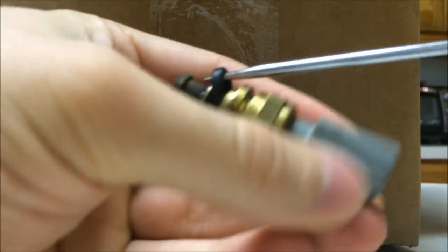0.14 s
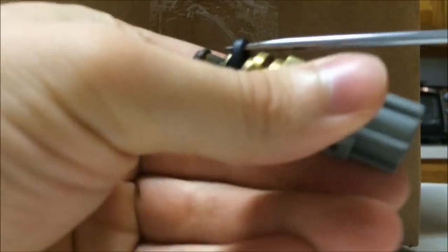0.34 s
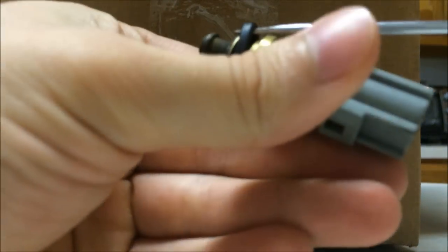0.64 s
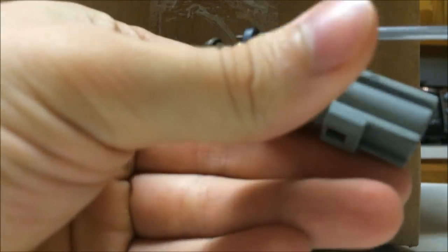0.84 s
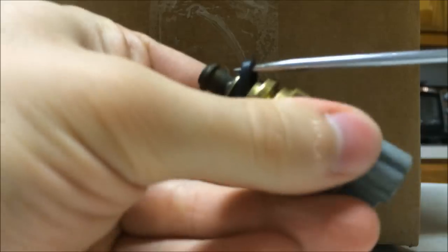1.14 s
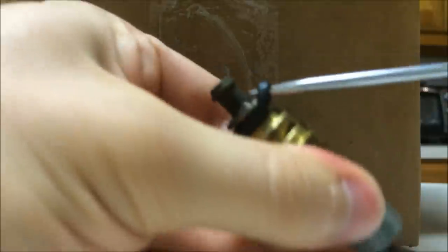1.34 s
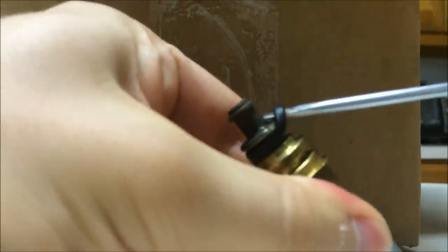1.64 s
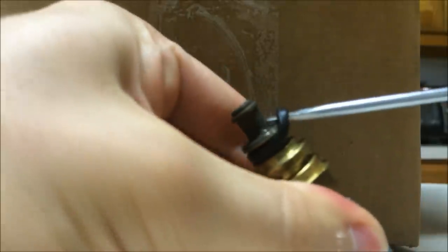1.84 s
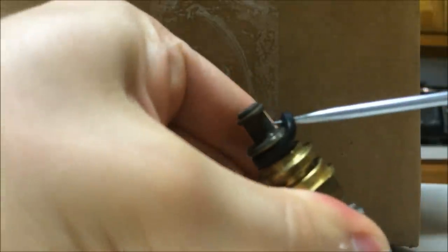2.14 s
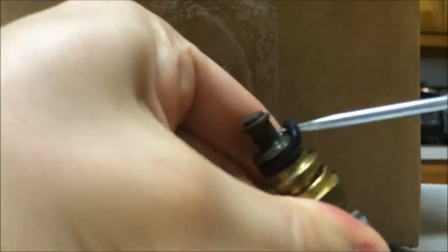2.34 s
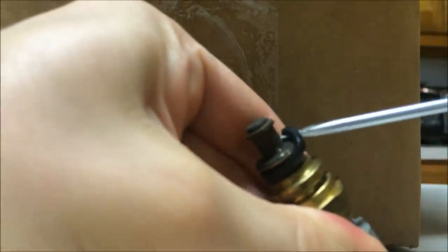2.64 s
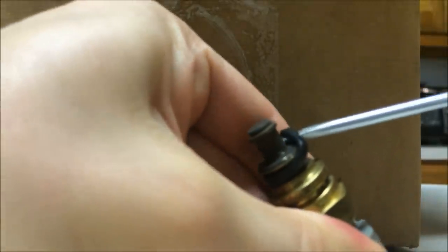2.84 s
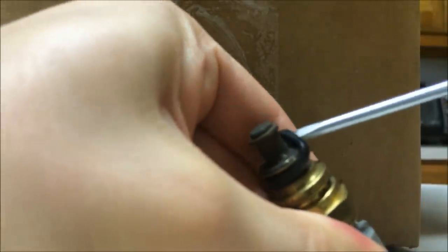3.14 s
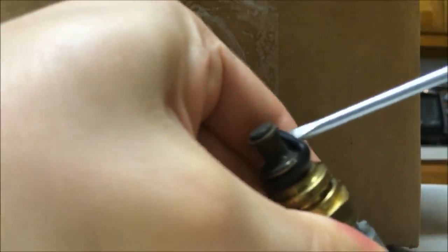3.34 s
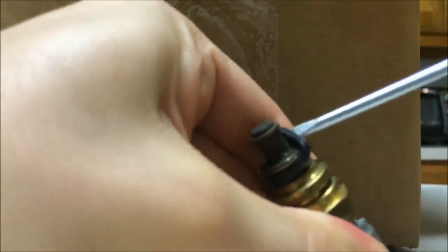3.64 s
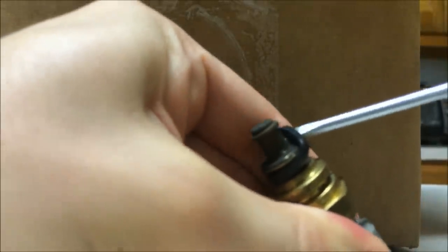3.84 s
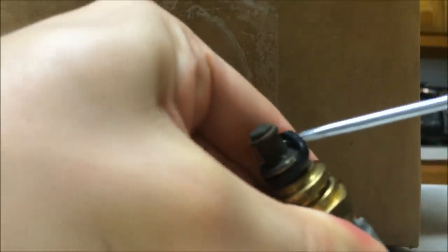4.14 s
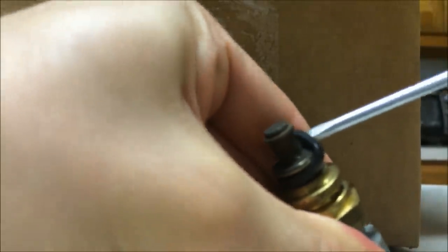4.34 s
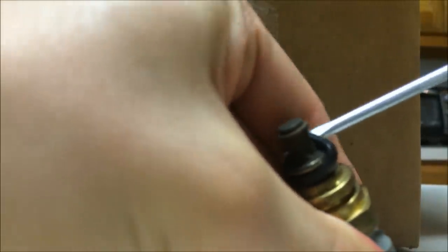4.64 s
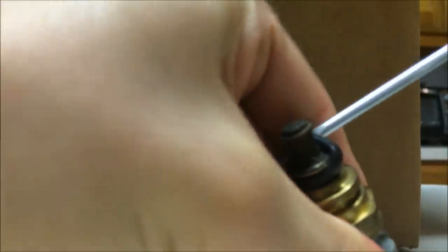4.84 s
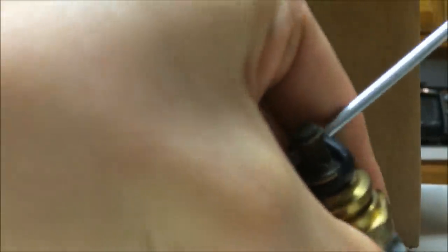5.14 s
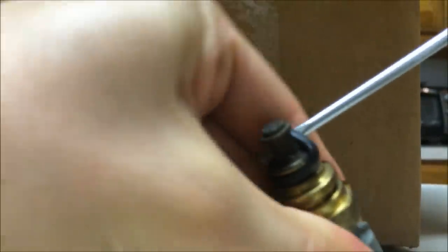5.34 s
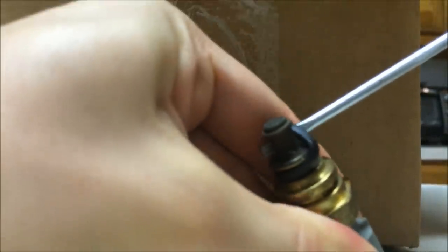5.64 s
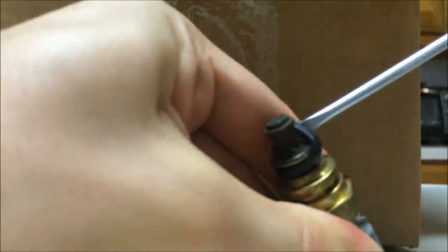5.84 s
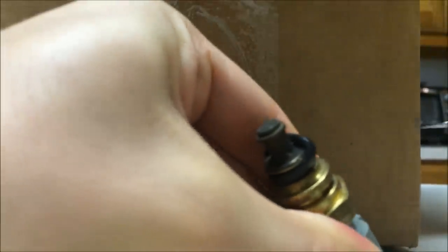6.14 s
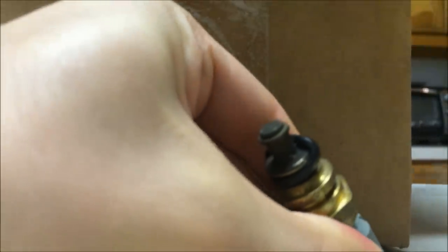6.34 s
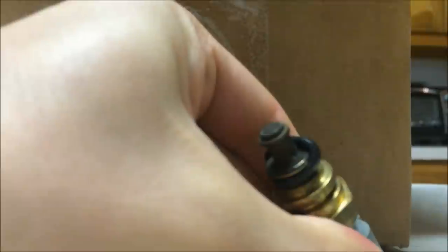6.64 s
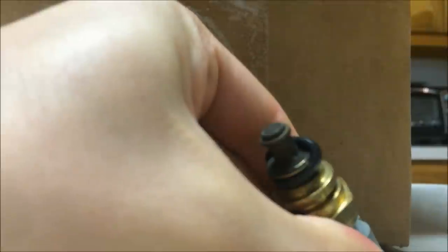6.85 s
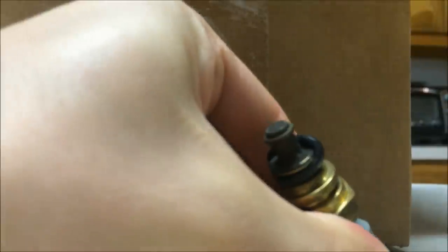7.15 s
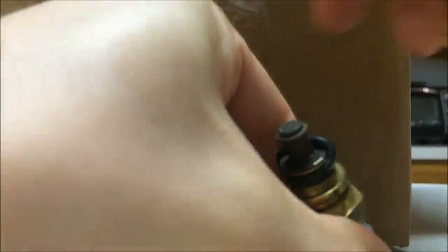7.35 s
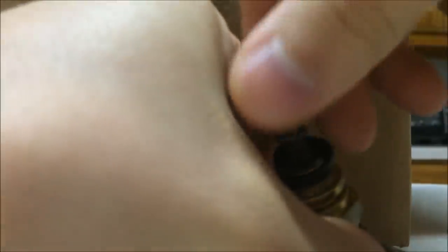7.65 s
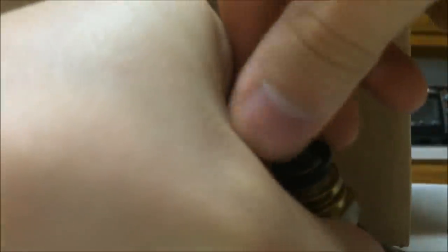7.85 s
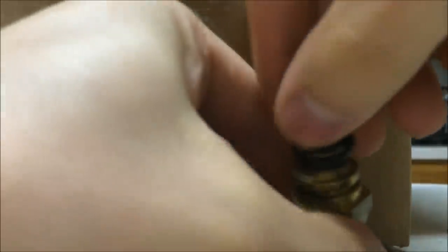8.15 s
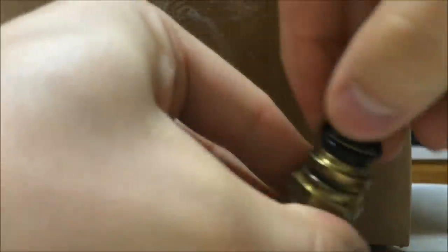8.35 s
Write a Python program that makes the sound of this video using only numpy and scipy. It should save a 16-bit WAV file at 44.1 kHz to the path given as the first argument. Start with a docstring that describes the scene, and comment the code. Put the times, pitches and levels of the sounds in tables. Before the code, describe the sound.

A screwdriver tip catches, scrapes and skids off a hand-held metal sensor; a thud, a rattling tool drop, then soft finger rubbing in a quiet room.

```python
"""Prying a rubber ring off a brass sensor

A screwdriver tip works on a hand-held sensor, close by, over a workbench in a small humming room.
It ticks, rubs and finally skids off; fingers brush and bump the part, and the bench is knocked.
Then the screwdriver drops and clatters on the bench, and bare fingers take over.
Blows are short dying tones plus noisy cracks; rubbing and the fan's rush are shaped noise; the hum is sines."""
import sys
import numpy as np
from scipy import signal
from scipy.fft import rfft, irfft, next_fast_len
from scipy.io import wavfile

SR = 44100
rng = np.random.default_rng(int(sys.argv[2]) if len(sys.argv) > 2 else 0)


def unload_audio(sound):
    """Save the sound as a 16-bit wav file, at the path given as the first command line argument."""
    columns = np.transpose(np.atleast_2d(sound))
    # keep every value between -1 and 1, then stretch to whole-number steps
    steps = np.round(np.clip(columns, -1, 1) * 32767)
    wavfile.write(sys.argv[1], SR, steps.astype(np.int16))


N = 373968
TIME = np.arange(N) / SR  # seconds

# tone colour of a hard contact of the tip: (frequency [Hz], relative level [dB])
TIP_CRACK = [(300, -15), (1500, -3), (3500, -3.5), (5500, 6), (7500, -1), (10000, -5), (13000, -1.5),
             (16000, -14)]
# pulls that drag the ring over its seat: (middle [s], length [s], level [dB])
DRAGS = [(1.71, 0.11, -71), (2.08, 0.13, -67), (2.21, 0.13, -65), (2.39, 0.38, -69), (2.8, 0.27, -66),
         (3.08, .3, -71), (3.6, 1.1, -73.5), (4.09, .18, -72), (4.78, .6, -73.5), (5.413, .04, -56.5),
         (5.58, .3, -72), (8.07, .16, -73), (8.33, 0.32, -69)]


def from_db(db):
    """Turn decibels into a gain."""
    return 10 ** (np.asarray(db) / 20)


def rms_one(x):
    """Scale to an rms (average strength) of 1."""
    return x / np.sqrt(np.mean(x ** 2) + 1e-20)


def at_hz(points, hz):
    """Read a table between its points, on a logarithmic frequency axis."""
    table = np.array(points)
    return np.interp(np.log(np.maximum(hz, 1)), np.log(table[:, 0]), table[:, 1])


def level(strokes):
    """Gain over time: every stroke swells and fades in one smooth arch."""
    gain = np.zeros(N)
    for middle, length, db in strokes:
        arch = np.cos(np.pi * np.clip((TIME - middle) / length, -.5, .5)) ** 1.4
        gain += from_db(db) * arch
    return gain


def drift(rate):
    """Random wander: straight lines between random values, `rate` values a second."""
    knots = rng.standard_normal(N // 50)
    return np.interp(TIME * rate, np.arange(len(knots)), knots)


def coloured(x, spectrum):
    """Filter to the given spectrum with no sound ahead of its cause (minimum phase); mean power gain 1."""
    size = 2 * next_fast_len(len(x) // 2 + 2048)
    hz = np.arange(size // 2 + 1) * SR / size
    gain = rms_one(from_db(at_hz(spectrum, hz)))
    # folding the cepstrum turns the gain into a minimum-phase filter
    cepstrum = irfft(np.log(gain))
    cepstrum[1:size // 2] *= 2
    cepstrum[size // 2 + 1:] = 0
    response = np.exp(rfft(cepstrum))
    return irfft(rfft(x, size) * response)[:len(x)]


def add(track, s, sound):
    """Mix a sound into the track at time s."""
    start = int(s * SR)
    track[start:start + len(sound)] += sound[:N - start]


def ring(modes, scatter_db, detune):
    """One blow on a body: damped sines whose strength and pitch vary at random from blow to blow."""
    hz, db, t60 = np.transpose(modes)[:, :, None]
    t = TIME[:int(np.max(t60) * SR * 2)]
    strength, shift = rng.standard_normal((2, len(hz), 1))
    signs = (-1) ** np.arange(len(hz))[:, None]
    gain = signs * from_db(db + scatter_db * strength)
    decay = np.exp(-np.log(1000) * t / t60)  # down 60 dB after t60
    tones = np.sin(2 * np.pi * hz * (1 + detune * shift) * t)
    return np.sum(gain * decay * tones, axis=0)


def crack(spectrum, t60, spike=1.7):
    """A hard contact: a spike, then a short burst of dense, fast-dying modes of fairly even strength."""
    evenness = .6  # 0: the modes have random strengths, 1: all alike
    t = TIME[:2048]
    decay = np.exp(-np.log(1000) * t / t60)
    force = rng.standard_normal(len(t)) * decay
    force[0] = spike
    modes = rfft(force)
    even = irfft(modes / np.abs(modes) ** evenness)
    even = even * decay ** (1 / 8)
    same_energy = np.linalg.norm(force) / np.linalg.norm(even)
    return coloured(even * same_energy, spectrum)


def friction(spectrum, slips_per_s, slip_db, flutter_db):
    """Rubbing: a smooth hiss with tiny slips in it, under uneven pressure; rms 1."""
    slips = (rng.random(N) < slips_per_s / SR) * rng.standard_normal(N)
    force = rng.standard_normal(N) + from_db(slip_db) * rms_one(slips)
    pressure = from_db(flutter_db * drift(70))
    return rms_one(coloured(force * pressure, spectrum))


def room_tone(waver):
    """A fan's soft rush (shaped noise) and its hum (sines that waver in level and phase)."""
    # tone colour of the rush: (frequency [Hz], relative level [dB])
    air_colour = [(15, -69), (25, -43), (49, -8), (86, -12), (119, -8), (144, -11), (204, -1.5), (289, -15),
                  (359, -12), (482, -22), (614, -23.5), (741, -26.5), (1270, -30.5), (1750, -35.5),
                  (15500, -45)]
    # hum of a fan in the room: (frequency [Hz], middle amplitude [dB])
    hum_tones = [(172.3, -70.5), (199.2, -65), (247.6, -81), (355.3, -75), (457.6, -74), (608.3, -75.5),
                 (1319, -85.5), (5755, -92.5)]
    air = from_db(-58) * rms_one(coloured(rng.standard_normal(N), air_colour))
    hum = np.zeros(N)
    for hz, db in hum_tones:
        gain = from_db(db + 2 * drift(8.6))
        hum += gain * np.sin(2 * np.pi * hz * TIME + waver * drift(9))
    return air + hum


def room(x, first_echo_s):
    """Spread-out reflections: noise bands, each dying at its own pace, with a total energy of 1."""
    # room decay: (frequency [Hz], time to fall by 60 dB [s])
    room_decay = [(100, 0.27), (500, 0.36), (1500, 0.42), (5000, 0.29), (9000, .3), (15000, .22)]
    t = TIME[:SR * 2 // 3]
    edges = np.geomspace(50, 16000, 10)
    tail = np.zeros(len(t))
    for low, high in zip(edges, edges[1:]):
        band_filter = signal.butter(2, [low, high], "band", fs=SR, output="sos")
        band = signal.sosfilt(band_filter, rng.standard_normal(len(t)))
        t60 = at_hz(room_decay, np.sqrt(low * high))
        tail += band * np.exp(-np.log(1000) * t / t60)
    tail *= np.clip(t / first_echo_s, 0, 1) ** 2  # the echoes build up first
    return signal.fftconvolve(x, tail / np.linalg.norm(tail))[:N]


def bench_knocks(knock_crack_db, thud_crack_db, wood_db, wood_t60):
    """Blows on the bench: a few strong modes, the dense rest of the board, a contact click."""
    # knock on the bench that sets a steel tool ringing: (time [s], level [dB])
    knock = (1.0843, -17.5)
    # a duller thud with its small rebound: (time [s], level [dB])
    thuds = [(6.3285, -15), (6.478, -48.5)]
    # tones of the knocked bench and tool: (frequency [Hz], level [dB], time to fall by 60 dB [s])
    knock_modes = [(165, -21, .12), (255, -14, .04), (560, -9, .05), (625, -17, .2), (665, 0, .04),
                   (1040, -9, .035), (1330, -8, .028), (1720, -17, .025), (2350, -20, .02),
                   (2700, -24, .015), (4100, -22, .03), (4145, -18, .13), (4630, -32, .17),
                   (6930, -43, .08), (8576, -36, .085), (9959, -44, .18), (11270, -52, .25)]
    # tones of the thud: (frequency [Hz], level [dB], time to fall by 60 dB [s])
    thud_modes = [(112.7, -6, 0.11), (203.5, -8.5, 0.08), (495, -2.5, 0.057), (586, -0.5, 0.0234),
                  (930, -7.5, 0.017), (1221, -8.5, 0.039), (1834, -32, .03), (2420, -48, .02)]
    # tone colour of the board's dense modes: (frequency [Hz], relative level [dB])
    wood_colour = [(100, -22), (500, 5), (1200, -8), (2000, -3.5), (2800, -14), (3600, -14), (6000, -25.5),
                   (16000, -29)]
    out = np.zeros(N)
    blows = [(knock, knock_modes, knock_crack_db)]
    blows += [(thud, thud_modes, thud_crack_db) for thud in thuds]
    for (s, db), modes, crack_db in blows:
        add(out, s, from_db(db) * ring(modes, scatter_db=1.6, detune=0.003))
        add(out, s, from_db(db + wood_db) * crack(wood_colour, wood_t60))
        add(out, s, from_db(db + crack_db) * crack(TIP_CRACK, t60=0.0091))
    return out


def bounces(count):
    """Contacts as (s, thud dB, crack dB): the handle, then each shaft slap with ever quicker rebounds."""
    # the dropped screwdriver's handle hits the bench: (time [s], level [dB])
    handle_hits = [(6.9018, -49.5), (6.9301, -25), (6.9395, -15), (6.9548, -16.5)]
    # the shaft slaps down and rattles on:
    # (time [s], crack level [dB], first rattle level [dB], first gap [s])
    landings = [(6.9655, -10, -17.5, .0104), (7.0271, -17.5, -22, .0086)]
    handle_crack_db, rattle_crack_db = -24, -12  # relative to the thud
    landing_thud_db = -21
    gap_ratio, loss_db = .955, 1.9  # per rebound
    scatter_db = 2  # the tool rolls, so rebounds land unevenly
    rows = [(s, db, db + handle_crack_db) for s, db in handle_hits]
    for s, crack_db, rattle_db, gap in landings:
        rows.append((s, landing_thud_db, crack_db))
        for k in range(count):
            s = s + gap * gap_ratio ** k
            db = rattle_db - loss_db * k + scatter_db * rng.standard_normal()
            rows.append((s, db, db + rattle_crack_db))
    return rows


def dropped_screwdriver(crack_t60):
    """Every bounce drums on the bench top; the steel shaft adds a hard crack."""
    # tones of the bench top: (frequency [Hz], level [dB], time to fall by 60 dB [s])
    bench_modes = [(125, -23.5, 0.12), (220, -19, .08), (304.3, -14, .07), (367, -10, 0.045),
                   (490, -11.5, 0.023), (754, -4, 0.033), (1025, -1, 0.035), (1260, 0.5, .016),
                   (1839, 1, .017), (2030, -5, 0.022), (2360, -14, 0.0049), (2980, -13, 0.014),
                   (4200, -21, 0.0067)]
    # tone colour of the shaft's crack: (frequency [Hz], relative level [dB])
    shaft_colour = [(300, -10), (1200, -2), (2400, -3), (3000, 3.5), (3500, 0), (4200, 1), (5000, -2),
                    (6200, -3), (8000, -5), (10500, -17), (13000, -21), (16000, -28)]
    out = np.zeros(N)
    for s, body_db, steel_db in bounces(count=6):
        add(out, s, from_db(body_db) * ring(bench_modes, scatter_db=1, detune=0.034))
        add(out, s, from_db(steel_db) * crack(shaft_colour, crack_t60))
    return out


def hand_bumps():
    """Flesh gives way with a low, short thump, and rumbles while it pulls at the ring."""
    # soft bumps of the hands: (time [s], level [dB])
    bumps = [(1.407, -47), (1.525, -48), (1.698, -38), (2.065, -42), (2.374, -40.5), (2.409, -46),
             (2.522, -46), (2.629, -47), (2.742, -44), (4.696, -41.5), (4.856, -43.5), (5.408, -42),
             (6.033, -35.5), (6.053, -33.5)]
    # tones of a bump: (frequency [Hz], level [dB], time to fall by 60 dB [s])
    hand_modes = [(59.6, -0.5, 0.11), (98, 1, 0.08), (150, -11, 0.12)]
    strain_db = 7  # rumble of the pulling hand, relative to the ring's drag
    strain_filter = signal.butter(2, [36, 115], "band", fs=SR, output="sos")  # Hz
    rumble = signal.sosfilt(strain_filter, rng.standard_normal(N))
    out = from_db(strain_db) * level(DRAGS) * rms_one(rumble)
    for s, db in bumps:
        add(out, s, from_db(db) * ring(hand_modes, scatter_db=1.5, detune=.07))
    return signal.sosfilt(signal.butter(2, 230, fs=SR, output="sos"), out)


def rubbing(skid_db, skid_hiss_db):
    """Skin hisses broadly, steel on brass sings, rubber drags in gritty slips; the skid runs away and stops."""
    # fingers sliding over the part: (middle [s], length [s], level [dB])
    slides = [(.1, .26, -72), (.165, 0.091, -65.5), (.25, 0.11, -65), (.34, .14, -68.5), (.51, .11, -68),
              (.625, .08, -74), (2.08, .14, -73), (2.2, 0.08, -65.5), (2.41, .18, -73), (2.81, 0.24, -72),
              (3.08, .2, -72.5), (4.7, 0.22, -72), (4.85, .13, -66.5), (8.38, 0.24, -70.5)]
    # strokes of the steel tip along the brass: (middle [s], length [s], level [dB])
    tip_strokes = [(2.83, .22, -65), (3.55, 1.6, -75.5), (4.07, 0.22, -72.5), (4.72, .12, -62),
                   (4.85, .14, -62.5), (5.05, 0.58, -75), (5.53, 0.17, -61), (5.76, 0.23, -71),
                   (5.97, .1, -72)]
    # tone colours of skin, steel on brass, and rubber: (frequency [Hz], relative level [dB])
    skin_colour = [(200, 0.5), (1000, -3.5), (2000, 3), (3200, -6.5), (6000, 1), (10000, -1), (14000, -1.5),
                   (16000, -15)]
    scrape_colour = [(400, -13.5), (1200, -6), (2050, -3.5), (3000, -44), (4400, -16), (4900, -3.5),
                     (5450, 6.5), (6300, -11), (9000, -26), (12000, -20.5), (16000, -4.5)]
    rubber_colour = [(300, -3), (1100, 0), (2000, 0), (2900, -6), (3800, -7), (4450, 1), (5100, -9),
                     (8000, -15), (16000, -20)]
    skin = friction(skin_colour, slips_per_s=720, slip_db=-4.0, flutter_db=2.5)
    steel = friction(scrape_colour, slips_per_s=600, slip_db=3, flutter_db=3.5)
    rubber = friction(rubber_colour, slips_per_s=150, slip_db=5, flutter_db=3.2)
    # the tip skids off the ring: loudest moment, then growth and stop time constants, in seconds
    skid_s, rise_s, stop_s = 6.0555, .019, 0.0018
    speed = np.exp(np.minimum((TIME - skid_s) / rise_s, (skid_s - TIME) / stop_s))
    skid = speed * (from_db(skid_db) * steel + from_db(skid_hiss_db) * skin)
    return level(slides) * skin + level(tip_strokes) * steel + level(DRAGS) * rubber + skid


def snaps(crack_t60, spike):
    """A sudden release: one dry, full-range crack and the brief screech of steel on brass."""
    # the tip slips off under load: (time [s], crack level [dB], steel screech level [dB])
    releases = [(1.4076, -16, -37), (4.4316, -44, -23), (6.0548, -32, -28)]
    # tone colours of the crack and the screech: (frequency [Hz], relative level [dB])
    snap_colour = [(100, -8), (250, -2), (600, 1), (1300, -1), (1800, -4), (4000, -3), (5400, 1), (7500, 0),
                   (9500, -1), (11000, -6), (16000, -10)]
    screech_colour = [(300, -16), (900, -18), (1600, -7), (2300, 0), (3200, -10), (5400, -1), (6500, -10),
                      (10500, -7), (13300, 1), (15000, -10)]
    out = np.zeros(N)
    for s, crack_db, screech_db in releases:
        add(out, s, from_db(crack_db) * crack(snap_colour, crack_t60, spike))
        add(out, s, from_db(screech_db) * crack(screech_colour, crack_t60, spike))
    return out


def tip_ticks(slip_s):
    """The tip catches, a fraction of a millisecond after the listed time; the hand damps the brass, so its ring
    is very short."""
    # tip and fingernails catching on the sensor:
    # (time [s], brass ring level [dB], bright edge level [dB])
    catches = [(0.401, -51.5, -58), (1.64, -62, -56), (2.177, -50, -60), (2.379, -47.5, -55.5),
               (2.523, -51, -54), (2.621, -52, -57), (2.735, -48, -55), (2.901, -50.5, -55.5),
               (3.004, -54.5, -54), (3.758, -54, -59), (3.788, -50.5, -59.5), (4.049, -54, -61),
               (4.3918, -38.5, -49), (4.3997, -44, -57), (4.4173, -52, -51), (4.4218, -44, -54),
               (4.589, -46, -59), (5.405, -38, -42.5), (5.484, -52, -48), (5.538, -59, -56),
               (5.58, -44, -53), (5.931, -57, -59), (6.029, -48, -46), (6.258, -70, -60), (6.308, -47, -55),
               (8.028, -54, -54.5), (8.041, -49, -58), (8.067, -48.5, -64), (8.237, -49.5, -70),
               (8.251, -50, -59), (8.269, -51, -67), (8.375, -45, -46)]
    # tones of the gripping hand: (frequency [Hz], level [dB], time to fall by 60 dB [s])
    grip_modes = [(200, -5, 0.026), (478, -0.5, 0.012), (910, 2.5, 0.0092), (1260, 2.5, 0.0097)]
    # tones of the brass: (frequency [Hz], level [dB], time to fall by 60 dB [s])
    brass_modes = [(1550, -2.5, 0.0057), (1856, -1, 0.011), (2370, -3, 0.0039), (3080, -6, 0.0056),
                   (3800, -11.5, 0.0055), (5420, -12, 0.019)]
    grip_db = -2  # the gripping hand's dull answer, relative to the brass ring
    out = np.zeros(N)
    for s, brass_db, edge_db in catches:
        grip = from_db(brass_db + grip_db) * ring(grip_modes, scatter_db=1, detune=.04)
        brass = from_db(brass_db) * ring(brass_modes, scatter_db=2, detune=.08)
        edge = from_db(edge_db) * crack(TIP_CRACK, t60=0.015, spike=3.0)
        for part in (grip, brass, edge):
            add(out, s + slip_s, part)
    return out


def scene():
    """The hands are close and dry; the bench is farther off and fills the room more."""
    ticks = tip_ticks(slip_s=0.00057)
    rubs = rubbing(skid_db=-37.5, skid_hiss_db=-46)
    hands = ticks + snaps(crack_t60=.008, spike=2.6) + rubs + hand_bumps()
    # in the treble, more of the tip's sound escapes the hand into the room
    spill = signal.sosfilt(signal.butter(1, 5500, "high", fs=SR, output="sos"), hands)
    knocks = bench_knocks(knock_crack_db=-54, thud_crack_db=-21, wood_db=-18, wood_t60=0.042)
    tool = dropped_screwdriver(crack_t60=0.021)
    hands_to_room = from_db(-22) * hands + from_db(-23) * spill
    bench_to_room = from_db(-18) * knocks + from_db(-15.5) * tool
    echoes = room(hands_to_room + bench_to_room, first_echo_s=0.013)
    return (hands + knocks + tool + echoes + room_tone(waver=1.1))[None]


def record(dry):
    """The small microphone loses the deepest bass; the top is cut steeply."""
    thinned = signal.sosfilt(signal.butter(2, 36, "high", fs=SR, output="sos"), dry)
    steep_cut = signal.ellip(10, .2, 70, 15400, fs=SR, output="sos")  # ripple dB, stop dB, edge Hz
    return signal.sosfilt(steep_cut, thinned)


dry = scene()
out = record(dry)
unload_audio(out)
```